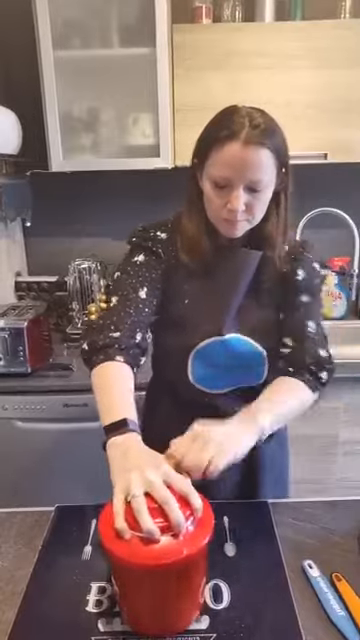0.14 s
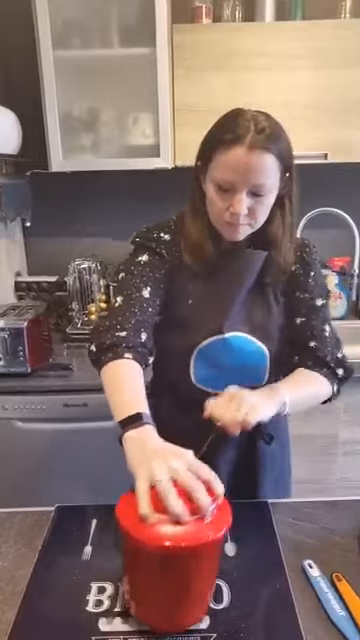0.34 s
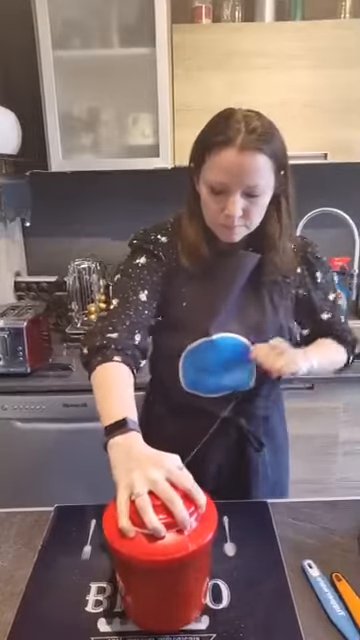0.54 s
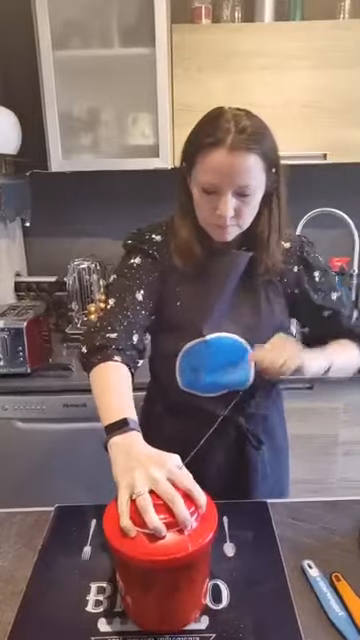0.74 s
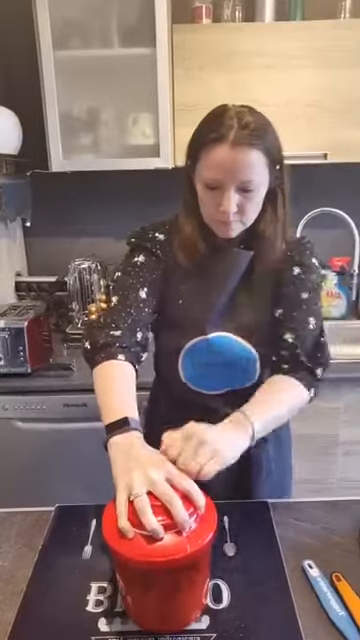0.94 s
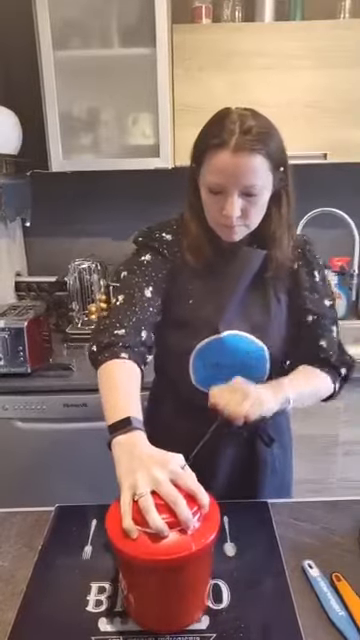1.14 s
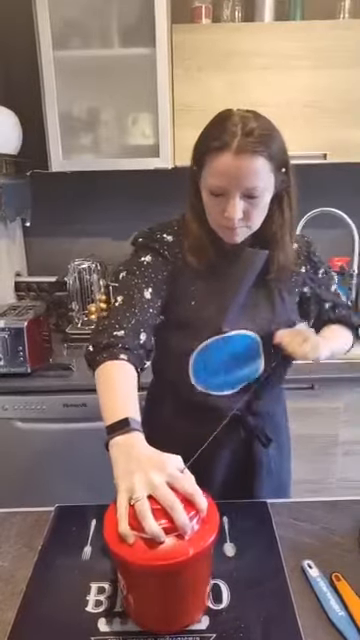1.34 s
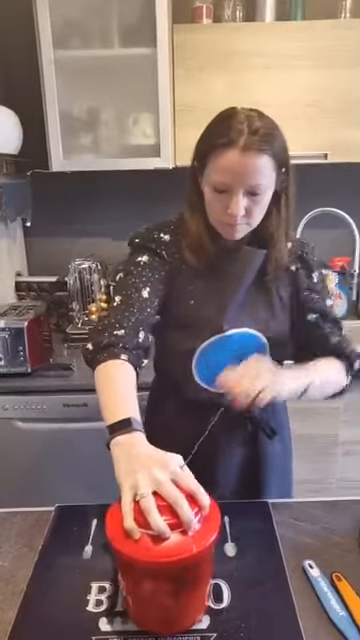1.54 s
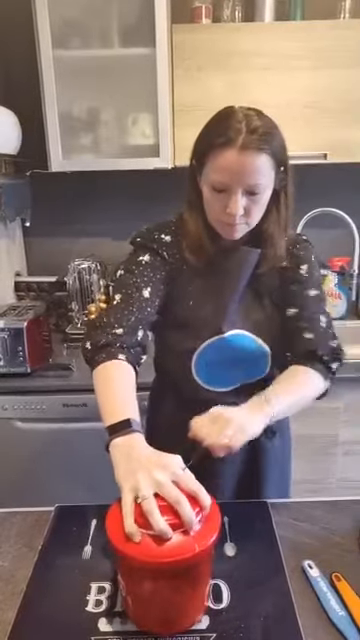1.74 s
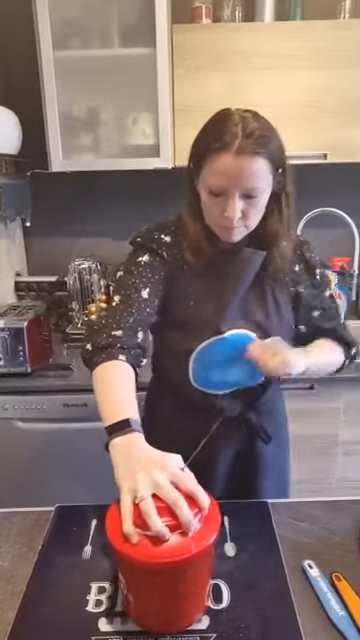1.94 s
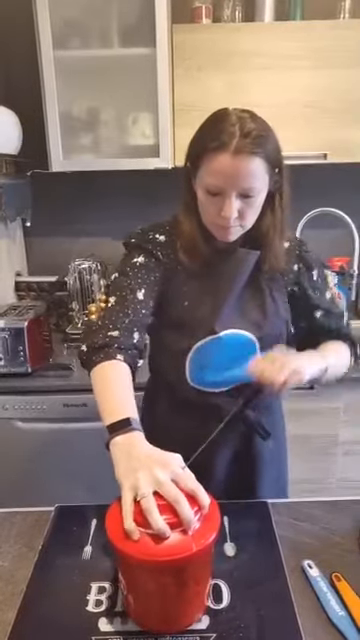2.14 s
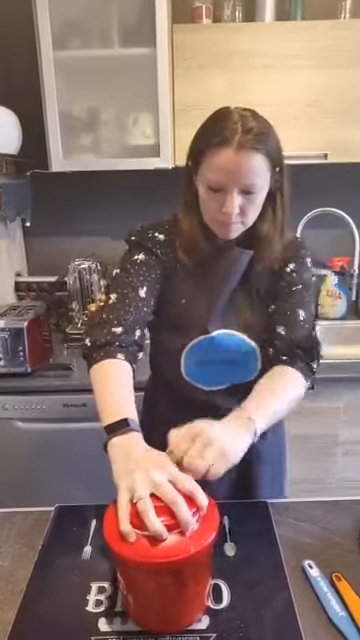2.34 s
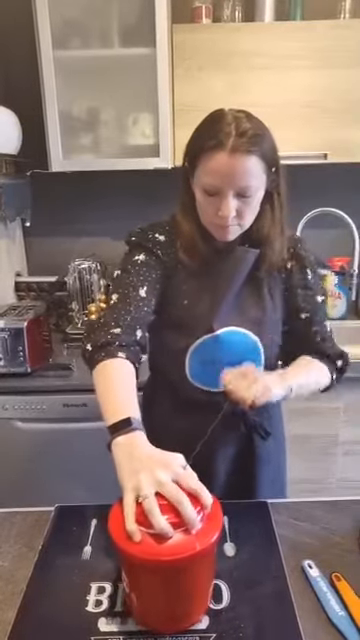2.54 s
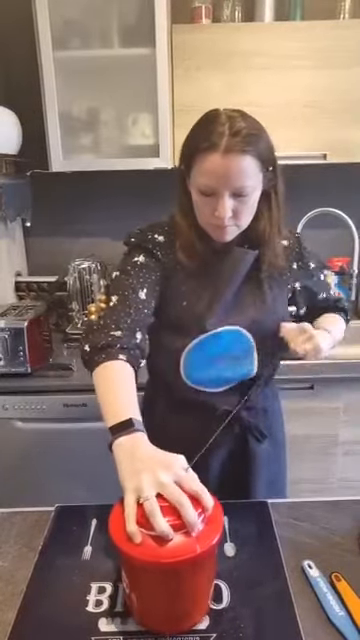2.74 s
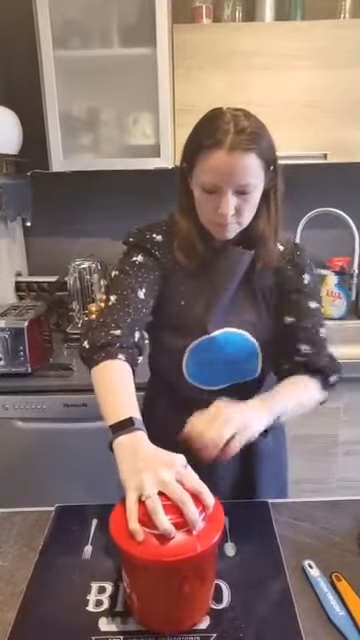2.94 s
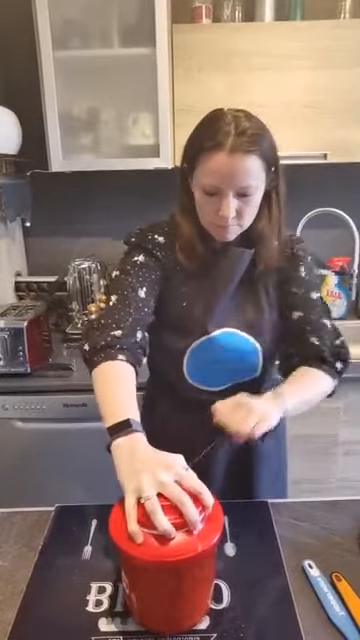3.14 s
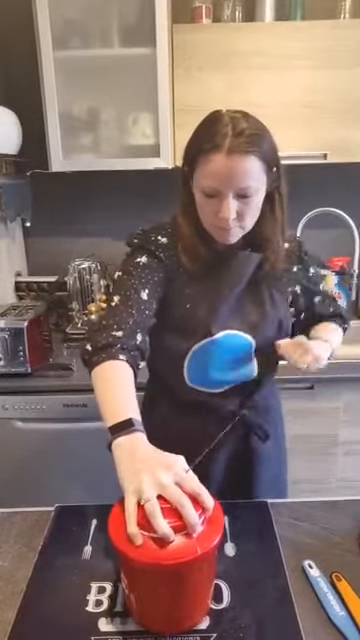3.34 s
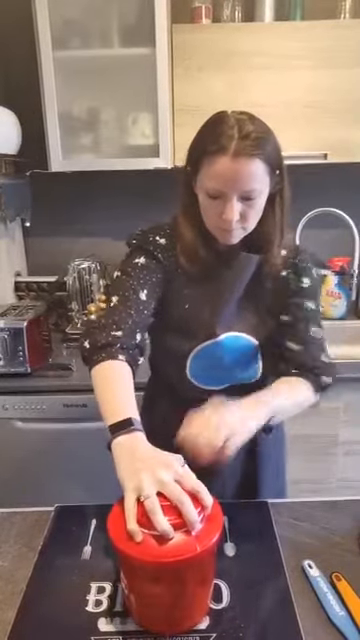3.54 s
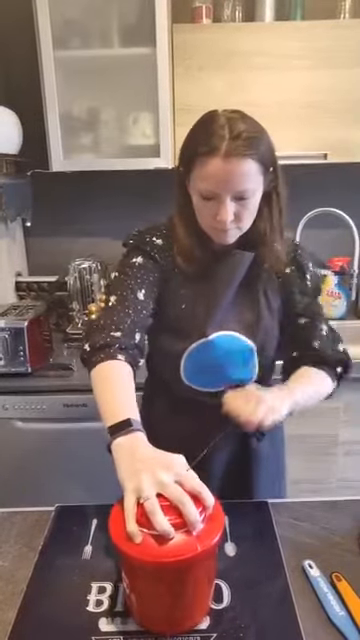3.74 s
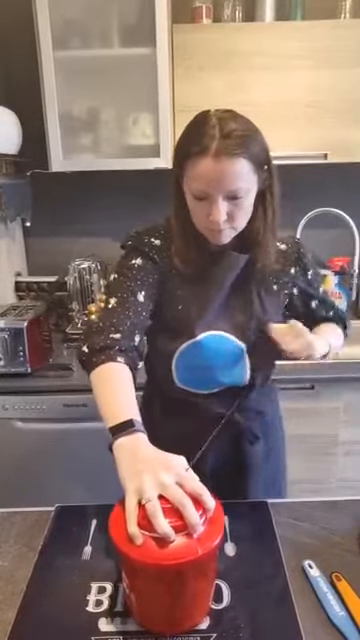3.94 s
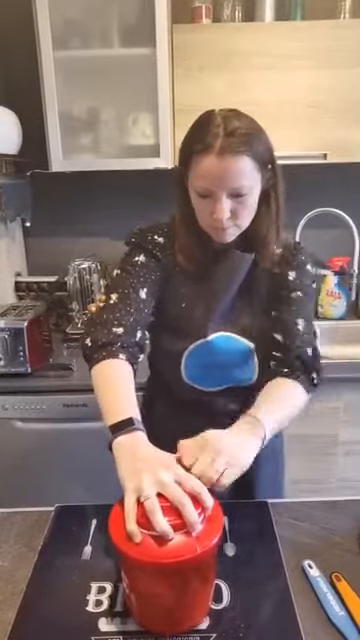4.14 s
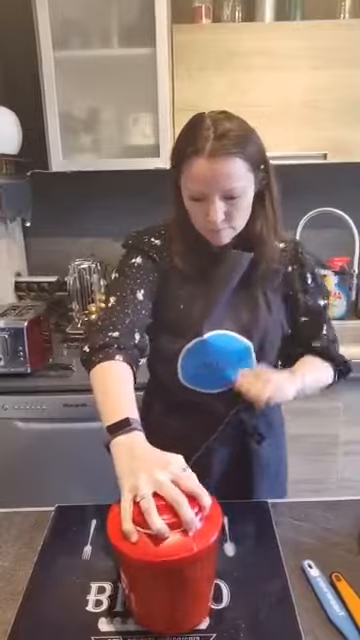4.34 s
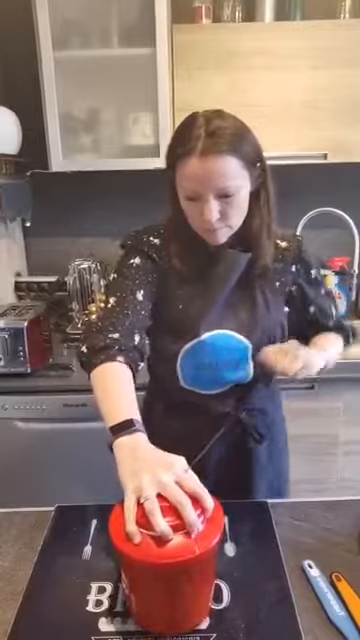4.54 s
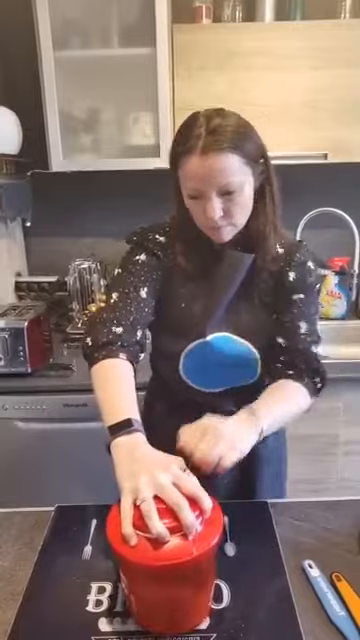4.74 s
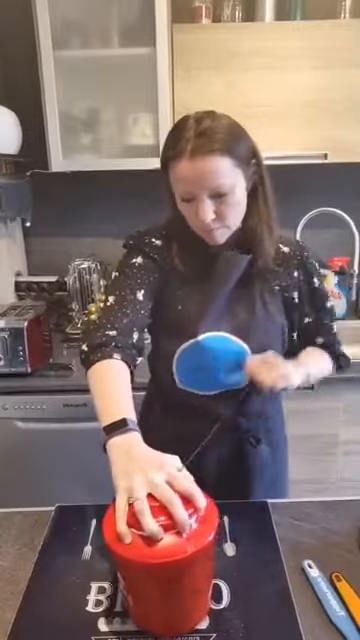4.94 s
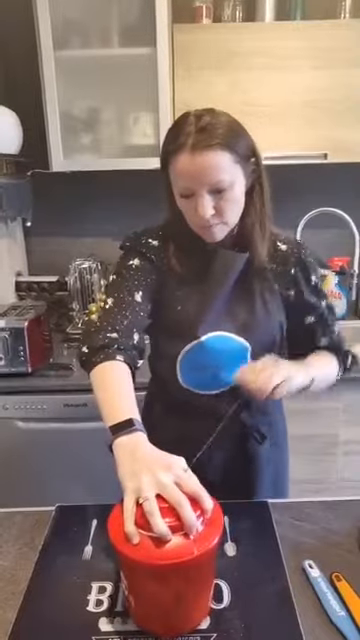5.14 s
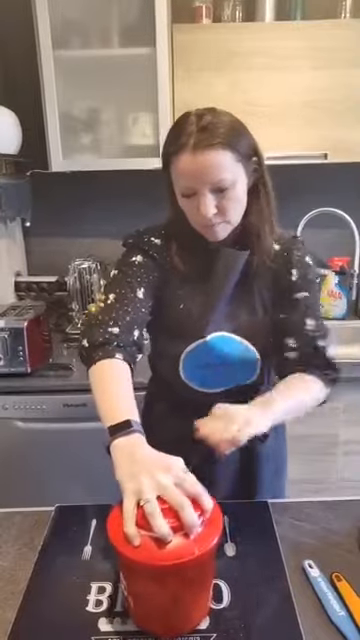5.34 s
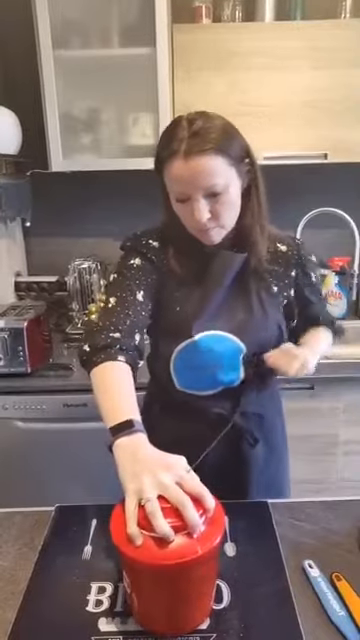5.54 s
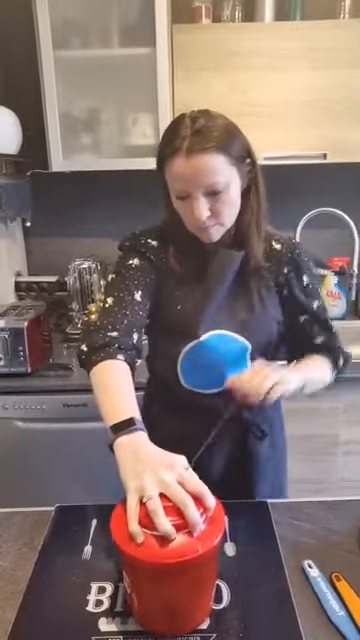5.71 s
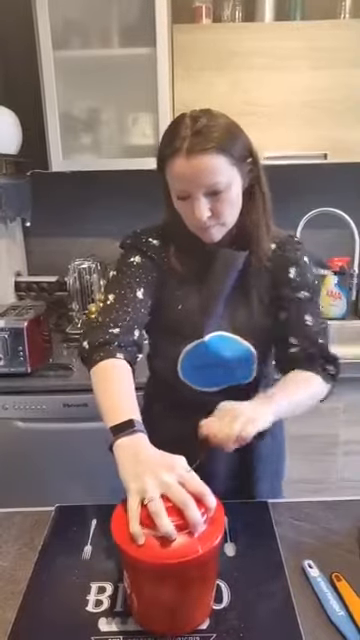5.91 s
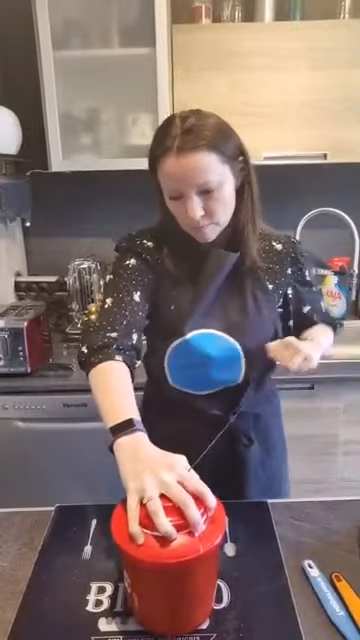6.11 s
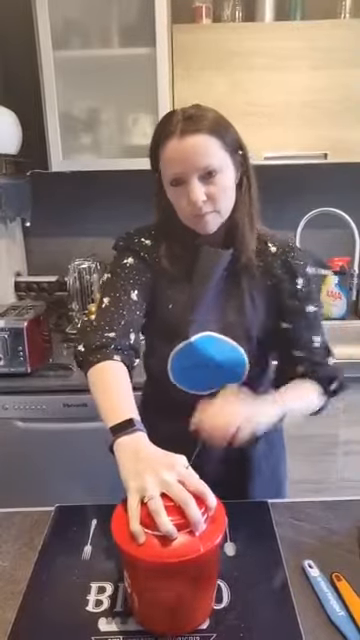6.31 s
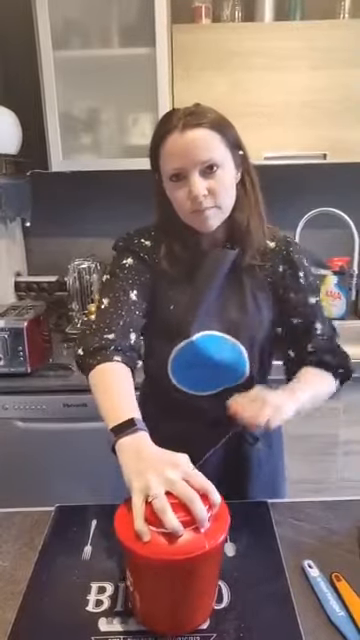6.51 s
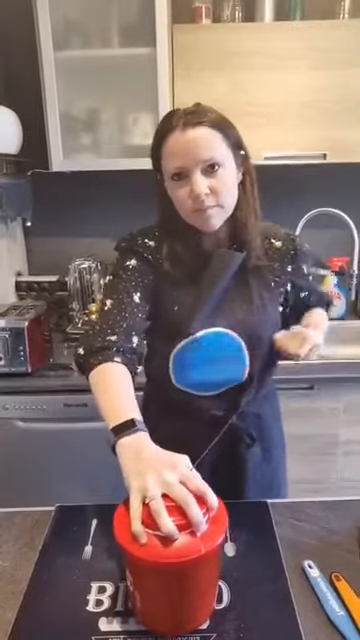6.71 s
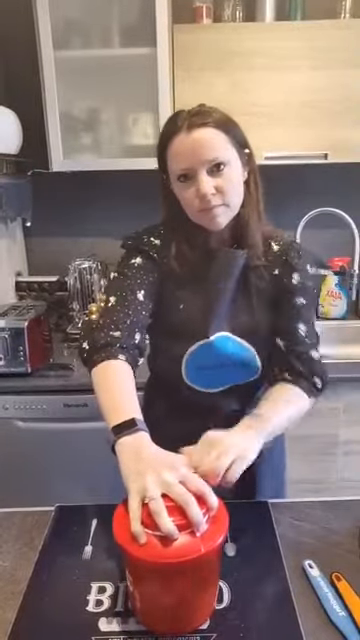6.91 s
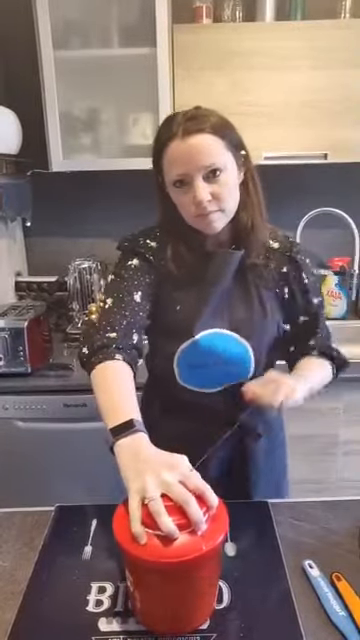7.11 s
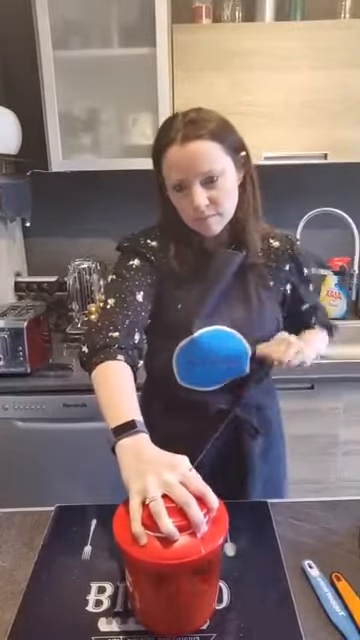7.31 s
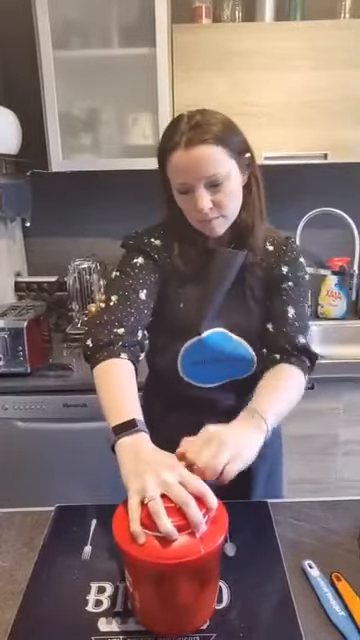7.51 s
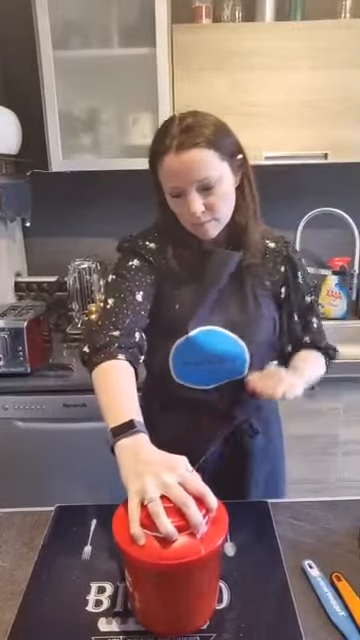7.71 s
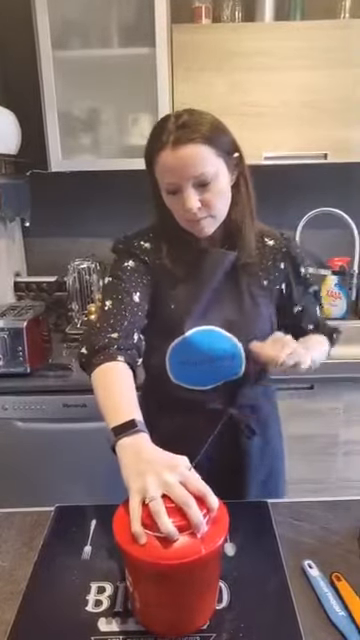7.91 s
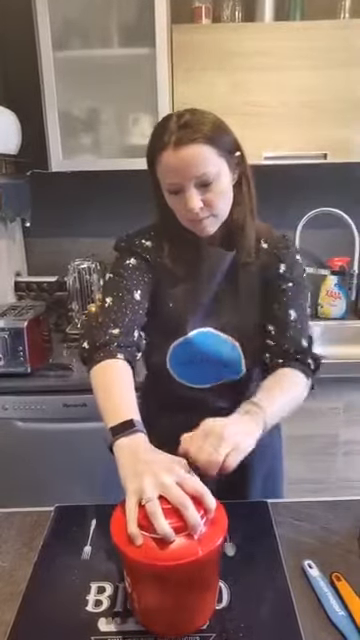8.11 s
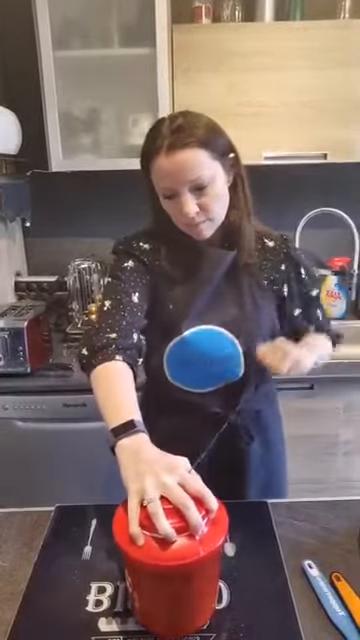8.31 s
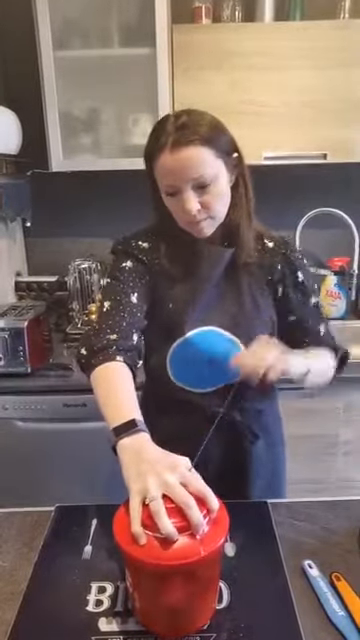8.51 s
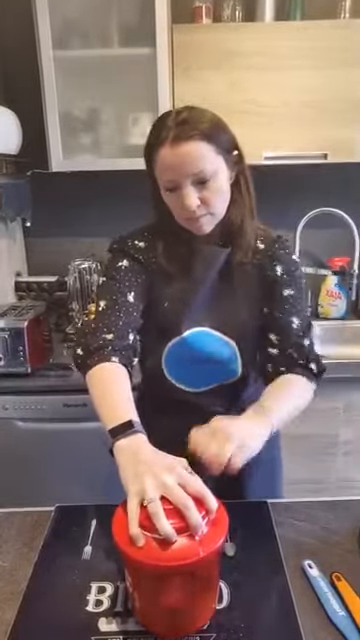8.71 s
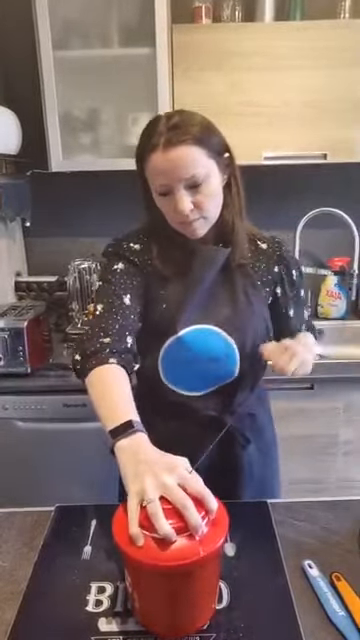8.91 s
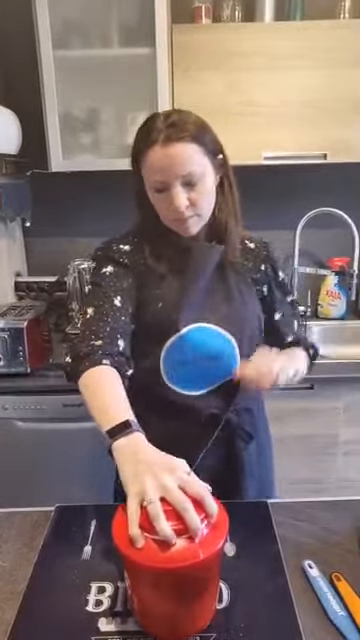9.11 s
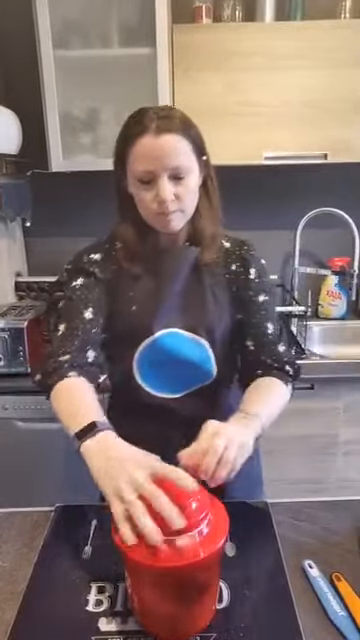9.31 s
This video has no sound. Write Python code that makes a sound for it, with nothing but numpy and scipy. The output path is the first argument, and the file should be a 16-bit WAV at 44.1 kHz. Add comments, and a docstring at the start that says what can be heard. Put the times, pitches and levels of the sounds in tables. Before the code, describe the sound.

A pull-cord kitchen chopper is yanked over and over, grinding biscuits in a plastic bowl and chattering as the cord rewinds.

```python
"""A pull-cord chopper on a counter in a small, hard kitchen. It opens on the cord rewinding.
Then, fifteen times: the clutch snaps in, the tug rocks the bowl on the counter, gears growl and blades
throw biscuit crumbs round the plastic bowl; the arm eases, the pawl catches and chatters in the lid
while the spring rewinds the cord. Here and there the cord snaps taut, the ratchet clicks or a chunk hits
the wall. The last rewind dies away into settling crumbs and a faint room hush."""
import sys
import numpy as np
from scipy import signal
from scipy.fft import rfft, irfft, next_fast_len
from scipy.io import wavfile
from scipy.ndimage import uniform_filter1d, map_coordinates

SR = 44100
rng = np.random.default_rng(int(sys.argv[2]) if len(sys.argv) > 2 else 0)


def log_audio(samples):
    """Write samples as a 16-bit WAV file to the path given in sys.argv[1]."""
    # one column per channel
    frames = np.atleast_2d(samples).T
    # limit to full scale, then quantise
    limited = np.clip(frames, -1, 1)
    pcm = np.round(limited * 32767).astype(np.int16)
    wavfile.write(sys.argv[1], SR, pcm)


N = 417186


def amp(db):
    """Decibels to gain."""
    return 10 ** (np.asarray(db) / 20)


def unit(x):
    """Scale to rms 1."""
    return x / np.sqrt(np.mean(x ** 2) + 1e-20)


def add(track, time_s, sound):
    """Mix a sound in at time_s."""
    track[round(time_s * SR):][:len(sound)] += sound


def log_interp(points, hz):
    """Interpolate (frequency [Hz], value) points on a log axis."""
    knots_hz, values = np.transpose(points)
    return np.interp(np.log(hz + 1), np.log(knots_hz + 1), values)


def wobble(rate_hz):
    """Smooth random curve through rate_hz knots a second."""
    knots = rng.standard_normal(int(N * rate_hz / SR) + 4)
    return map_coordinates(knots, [np.arange(N) * rate_hz / SR])


def coloured(x, spectrum, modes=()):
    """Minimum-phase filter: broad spectrum plus resonance humps; output rms 1."""
    size = 8192
    hz = np.fft.rfftfreq(size, 1 / SR)
    humps_db = sum(db / (1 + (2 * (hz - centre) / width) ** 2) for centre, width, db in modes)
    gain_db = np.maximum(log_interp(spectrum, hz) + humps_db, -100)
    cepstrum = irfft(np.log(amp(gain_db)))
    cepstrum[1:size // 2] *= 2
    cepstrum[size // 2 + 1:] = 0
    impulse = irfft(np.exp(rfft(cepstrum)))
    return unit(signal.fftconvolve(x, impulse)[:N])


def grains(rate_hz, spread_db, decay_s, scrape):
    """Random impacts: tiny noise bursts of uneven size over a bed of scraping."""
    sizes = amp(spread_db * np.clip(rng.standard_normal(N), -2, 2))
    hits = (rng.random(N) < rate_hz / SR) * sizes
    bursts = signal.lfilter([1], [1, -np.exp(-1 / (decay_s * SR))], hits)
    return (unit(bursts) + scrape) * rng.standard_normal(N)


def patchy(x, depth_db):
    """Each impact lands somewhere else, so resonances come and go."""
    bins = signal.stft(x, nperseg=512)[2]
    field = uniform_filter1d(rng.standard_normal(bins.shape), size=5, axis=0)
    field = uniform_filter1d(field, size=8, axis=1)
    return unit(signal.istft(bins * amp(depth_db * unit(field)), nperseg=512)[1][:N])


def room_hush():
    """Faint, steady, dull noise."""
    return amp(-56) * coloured(rng.standard_normal(N), [(30, -6), (150, 3), (2000, -1), (16000, -29)])


# (frequency [Hz], t60 [s])
KITCHEN_DECAY = [(150, 0.38), (2000, 0.34), (12000, 0.16)]

def kitchen_reverb(x):
    """Diffuse room tail; treble dies first."""
    hz, t, bins = signal.stft(rng.standard_normal(SR // 2), SR, nperseg=256)
    decay = amp(-60 * t / log_interp(KITCHEN_DECAY, hz)[:, None])
    tail = signal.istft(bins * decay, SR, nperseg=256)[1]
    return signal.fftconvolve(np.pad(x, (200, 0)), tail / np.linalg.norm(tail))[:N]


# (frequency [Hz], level [dB])
RUMBLE_SPECTRUM = [(12, -45), (20, -16), (101, -8.5), (135, -3), (167, -4.5), (210, 0.5), (280, -2),
                   (360, -27), (620, -120)]

def counter_rumble(level_db):
    """The spinning load shakes the counter top."""
    gain = amp(level_db - 1.5 + 1.7 * wobble(12))
    return gain * coloured(rng.standard_normal(N), RUMBLE_SPECTRUM, [(145.6, 14, 5.7)])


# (frequency [Hz], level [dB], t60 [s])
COUNTER_MODES = [(35, -16, .07), (70.6, -6, 0.1), (137.6, -1.5, 0.15), (205, 0, 0.085)]
# rocking between tugs: (time [s], level [dB])
BOWL_ROCKS = [(0.568, -22.5), (1.547, -35), (1.922, -24), (2.816, -27.5), (5.535, -28), (6.753, -30),
              (7.897, -30)]

def counter_thumps(tug_lag_s=0.048):
    """The bowl rocks, at each tug and between some, and rings the counter top."""
    out, t = np.zeros(N + SR), np.arange(SR // 4) / SR
    attack = 1 - np.exp(-t / 0.0098)
    tugs = [(pull[0] + tug_lag_s, pull[7]) for pull in CORD_PULLS]
    for time_s, db in BOWL_ROCKS + tugs:
        ring = sum(amp(mode_db + rng.normal(0, 1.9) - 60 * t / t60_s) * np.sin(2 * np.pi * hz * t)
                   for hz, mode_db, t60_s in COUNTER_MODES)
        add(out, time_s, amp(db - 1) * attack * ring)
    return out[:N]


# hollow bowl, blade whine, spool ring, spring zing: (frequency [Hz], width [Hz])
PART_RESONANCES = [(779.8, 272), (4310, 250), (2110, 330), (8520, 520)]

def part_rings(level_db, pull_share, ring_dbs, sag_per_db=0.01, sag_below_db=-33):
    """Uneven blows ring bowl and blades on the pull, spool and spring on the rewind."""
    out = np.zeros(N)
    pitch_ratio = 1 + sag_per_db * np.clip(level_db - sag_below_db, -15, 0)
    clock = np.cumsum(pitch_ratio)
    shares = [pull_share, pull_share, 1 - pull_share, 1 - pull_share]
    for (hz, width_hz), db, share in zip(PART_RESONANCES, ring_dbs, shares):
        b, a = signal.iirpeak(hz, hz / width_hz, SR)
        blows = grains(140, spread_db=3, decay_s=0.0085, scrape=0.79)
        tone = unit(signal.lfilter(b, a, signal.lfilter(b, a, blows)))
        out += share * amp(db + 1.7 * wobble(16)) * map_coordinates(tone, [clock], mode="mirror")
    swell_db = 0.36 * (level_db + 29)  # rings grow faster with cord speed than the rattle
    return amp(level_db + swell_db) * out


# (frequency [Hz], level [dB])
GEAR_SPECTRUM = [(140, -56), (230, -17.5), (345, 0), (496, -5), (738, -3), (806, -6.5), (1680, -4.5),
                 (1900, -4.5), (2470, -42.5), (4180, -120)]
# (frequency [Hz], width [Hz], boost [dB])
BODY_MODES = [(339, 22, 3.5), (575, 17, 6.5), (730, 31, 2.5), (1290, 99, 2.5)]

def gear_growl(level_db, centre_hz):
    """Uneven gear teeth shake the bowl; its hollow ring moves with cord speed."""
    teeth = coloured(grains(500, spread_db=3.3, decay_s=0.0016, scrape=1), GEAR_SPECTRUM, BODY_MODES)
    hz, t, bins = signal.stft(teeth, SR, nperseg=1024)
    hump_hz = np.interp(t * SR, np.arange(N), centre_hz)
    hump_db = 6 / (1 + ((hz[:, None] - hump_hz) / (0.4 * hump_hz)) ** 2)
    hollow = signal.istft(bins * amp(hump_db), SR, nperseg=1024)[1][:N]
    return amp(level_db - 0.74) * patchy(hollow, depth_db=2.55)


# (time [s], level [dB], pitch [Hz])
BOWL_KNOCKS = [(0.455, -9.5, 1065), (1.841, -27, 750), (2.206, -22, 2130), (2.76, -18.5, 760),
               (3.755, -23.5, 690), (4.323, -27, 362.7), (4.457, -16, 735), (5.453, -22, 735),
               (5.741, -27, 1950), (6.04, -18, 801), (6.545, -26, 1480), (6.6, -17, 900),
               (6.764, -16.5, 358), (7.913, -24, 423)]

def bowl_knocks(t60_cycles=22):
    """The cord goes taut or a chunk hits the light wall: damped pitch, dull crack, no deep bass."""
    out, t = np.zeros(N + SR), np.arange(SR // 8) / SR
    attack = 1 - np.exp(-t / 0.0014)
    for time_s, db, hz in BOWL_KNOCKS:
        crack = 1.7 * amp(-60 * t / 0.11) * uniform_filter1d(rng.standard_normal(len(t)), size=12)
        tone = amp(-60 * t * hz / t60_cycles) * np.sin(2 * np.pi * hz * t)
        add(out, time_s, amp(db - 3.5) * attack * (tone + crack))
    return signal.sosfilt(signal.butter(2, 150, "high", fs=SR, output="sos"), out[:N])


# (frequency [Hz], level [dB], t60 [s])
LID_MODES = [(2007, -1.5, 0.026), (2113, 3, 0.0094), (4490, 1, 0.0047), (5650, -3, 0.011),
             (7210, -1.5, 0.011), (8700, -4, 0.016), (11900, -37, .02), (14070, -14, .02)]
# cord snapping taut, stray ratchet clicks: (time [s], level [dB], body knock [dB])
LID_CLICKS = [(0.1296, -16, -10), (0.1855, -10.5, -28), (0.208, -15, -22), (0.3252, -15, -16),
              (1.8193, -22, -21), (2.2544, -15, -8), (2.511, -15.5, -10), (2.819, -19, -2),
              (2.9307, -22, -11), (3.6207, -20, -16), (3.6458, -12, -8), (3.7618, -19, -18),
              (4.205, -17, -10), (4.9043, -13, -11), (5.1934, -28, 4), (5.8082, -21, -7),
              (6.0026, -18, -10), (6.3096, -26, -3), (6.965, -22, -10), (7.174, -19, -16),
              (7.4762, -13, -15), (8.5649, -21, 3.5), (8.5867, -20, -7), (8.62, -11, -14),
              (9.3646, -15, -26)]

def lid_clicks(snap_knock_db=-10, catch_knock_db=-4.5):
    """Clutch, taut cord and pawl: double contacts crack and ring the lid; knock sets its low modes."""
    out, t = np.zeros(N + SR), np.arange(SR // 20) / SR
    attack = 1 - np.exp(-t / 0.0002)
    snaps = [(pull[0], pull[6], snap_knock_db) for pull in CORD_PULLS]
    catches = [(rewind[0], rewind[6], catch_knock_db) for rewind in CORD_REWINDS if rewind[0] > 0]
    for time_s, db, knock_db in snaps + catches + LID_CLICKS:
        ring = np.zeros(len(t))
        for hz, mode_db, t60_s in LID_MODES:
            struck_db = mode_db + rng.normal(0, 4.06) + (knock_db + 6.5) * (hz < 3000)
            ring += amp(struck_db - 60 * t / t60_s) * np.sin(2 * np.pi * hz * t + rng.uniform(0, 6.1))
        crack = 0.63 * amp(-60 * t / 0.022) * np.diff(rng.standard_normal(len(t) + 1))
        click = amp(db - 15.5) * attack * (ring + crack)
        add(out, time_s, click)
        add(out, time_s + rng.uniform(0.002, 0.006), 0.92 * click)
    return out[:N]


def movement_power(moves, start_db, engage_s):
    """Rattle power: each cord movement speeds up, holds, then fades."""
    t, power = np.arange(N) / SR, np.zeros(N)
    for start_s, rise_s, hold_s, full_db, eased_db, fade_db_per_s, *_ in moves:
        knots_s = [0, rise_s, rise_s + hold_s, rise_s + hold_s + 1]
        db = np.interp(t - start_s, knots_s, [start_db, full_db, eased_db, eased_db - fade_db_per_s])
        power += np.clip((t - start_s) / engage_s, 0, 1) * amp(2 * db)
    return power


def held_columns(moves, count):
    """Last count columns of the latest movement, per sample."""
    moves = np.array(moves)
    latest = np.searchsorted(moves[:, 0], np.arange(N) / SR, side="right") - 1
    return moves[np.maximum(latest, 0), -count:].T


# (start [s], rise [s], hold [s], full [dB], eased [dB], fade [dB/s], clutch snap [dB], tug [dB],
#  then re rattle: growl [dB], growl sag [dB], rumble [dB], fizz [dB], bowl [dB], whine [dB])
CORD_PULLS = [(0.2853, 0.17, 0.2, -27.5, -27, 140, -19, -32, 0, 2.5, -13.5, -8.5, -20, -15.5),
              (1.065, 0.12, 0.22, -27.5, -26.5, 165, -22, -25.5, -4, -0.5, -16, -8.5, -16, -12.5),
              (1.7754, 0.08, 0.22, -28, -28.5, 149, -17.5, -40, -3, -0.5, -14, -6.5, -7, -18),
              (2.4514, 0.12, 0.2, -27.5, -30.5, 148.7, -14, -29, -1.5, -1.5, -14.5, -7, -16, -12.5),
              (3.1398, 0.1, 0.13, -27, -27.5, 150.3, -9, -33, -2, 3.5, -14.5, -8, -24, -10.5),
              (3.718, 0.093, 0.12, -27, -26.5, 149, -17, -38, -0.5, 5, -15, -6.5, -16, -17),
              (4.2672, 0.11, 0.14, -25.5, -28.5, 164.2, -15, -34, -0.5, 4.5, -15.5, -5.5, -4.5, -15),
              (4.8384, 0.13, 0.12, -26.5, -31.5, 165, -16.5, -35, 0.5, 3, -10.5, -5.5, -5, -17),
              (5.4006, 0.1, 0.13, -29, -30.5, 164.8, -17, -40, -1, 2, -12, -5, -11, -13),
              (5.9653, 0.087, 0.14, -28, -31.5, 165, -12.5, -36, 0.5, 7, -10.5, -5.5, -9, -13),
              (6.5073, 0.1, 0.13, -29.5, -31, 165, -20.5, -36, -0.5, 3, -10, -4.5, -15, -12),
              (7.0689, 0.084, 0.13, -30, -30.5, 150.3, -14, -23.5, 2, 8, -13, -5, -8.5, -7),
              (7.6381, 0.093, .142, -29.5, -31, 164, -16, -28, 0.5, 3, -10.5, -7.5, -12, -11.5),
              (8.2101, 0.098, 0.12, -30.5, -31, 165, -21, -45, -2, 0, -12.5, -5.5, -11, -12),
              (8.8022, 0.11, 0.11, -29.5, -33, 164.6, -19, -50, 0, 3, -15, -6, -15, -16)]
# (start [s], rise [s], hold [s], full [dB], cord home [dB], fade [dB/s], pawl catch [dB],
#  then re rattle: growl [dB], rumble [dB], fizz [dB], spool [dB], zing [dB])
CORD_REWINDS = [(-.12, 0.17, 0.12, -33.5, -36, 135, -40, -4, -19, -10.5, -16, -28),
                (.7751, .09, 0.054, -35, -37.5, 130, -20, -8, -19, -8, -14.5, -14),
                (1.5265, 0.056, 0.093, -34, -38.5, 160.2, -19.5, -5.5, -12, -9, -20, -8),
                (2.2124, 0.012, 0.11, -33, -38.5, 160.5, -17.5, -5.5, -18.5, -8, -13, -12),
                (2.89, 0.031, 0.12, -33, -35.5, 160, -29, -6.5, -17, -7, -11, -4),
                (3.482, 0.033, 0.12, -35, -35.5, 159.8, -19, -5.5, -15.5, -6.5, -3, -7),
                (4.0478, .047, 0.091, -34, -33.5, 170, -19.5, -4.5, -13.5, -9, -8, -7.5),
                (4.611, .084, 0.069, -31.5, -36.5, 160, -25, -5.5, -13, -9.5, -8, -22),
                (5.1706, 0.032, 0.11, -36.5, -35, 180, -30, -5, -12, -10, -7, -7),
                (5.7355, .012, 0.11, -36, -33.5, 170.8, -25, -6, -16, -7.5, -4, -5.5),
                (6.27, 0.11, 0.034, -33, -33, 172, -34, -8, -15, -7.5, -7.5, -8),
                (6.836, 0.064, 0.086, -32, -35.5, 169.7, -26, -6, -15.5, -8, -14, -14),
                (7.412, 0.034, 0.092, -36, -34, 161, -25, -8, -16, -6, -4.5, -4.5),
                (8.006, .055, 0.075, -32.5, -39.5, 170.5, -25, -5, -14, -7, -5, -8),
                (8.5505, 0.048, 0.069, -35, -32, 170.3, -35, -7, -17, -8, -6.5, -7),
                (9.1438, 0.028, 0.16, -34, -41, 148, -33, -7.5, -13.5, -10, -16.5, -21)]

def cord_drive(settling_db=-57):
    """Rattle level from pulls, rewinds and settling crumbs, and the pulls' share of it (0-1)."""
    pull = movement_power(CORD_PULLS, start_db=-43.5, engage_s=0.003)
    rewind = movement_power(CORD_REWINDS, start_db=-41, engage_s=0.013)
    power = pull + rewind + amp(2 * settling_db)
    return 10 * np.log10(power), np.clip(uniform_filter1d(pull / power, size=600), 0, 1)


# stages: 0 clutch bites, 1 full speed, 2 arm eases, 3 pawl catches, 4 full rewind, 5 cord home, 6 = 0
# (stage, growl swing [dB], growl centre [Hz], rumble swing [dB], fizz swing [dB])
STROKE_CYCLE = [(0, 2, 830, 1, -9), (.25, -3.5, 860, 1.5, -0.5), (.5, .5, 900, 3, 3.5),
                (.8, 0.5, 950, 2, 2), (1.2, -1, 870, -0.5, 0.5), (2, -0.5, 800, -3.5, -2),
                (2.5, 2.5, 795.3, 1.5, -3.5), (2.95, 6, 800, 5.5, -2), (3.3, 3.5, 855, 2, 2.5),
                (4, 0.5, 890, 1, 0.3), (5.002, -1, 870, -0.5, -1), (6.001, -2, 855, 3, -6.5)]

def stroke_timbre(pull_share):
    """Layer levels re rattle and growl centre, following the stages of each stroke."""
    stages_s = [np.cumsum(move[:3]) for move in sorted(CORD_PULLS + CORD_REWINDS)] + [[N / SR]]
    stages_s = np.maximum.accumulate(np.concatenate(stages_s))
    stage = np.interp(np.arange(N) / SR, stages_s, 3 + np.arange(len(stages_s))) % 6
    knots, *curves = np.transpose(STROKE_CYCLE)
    growl_db, centre_hz, rumble_db, fizz_db = [np.interp(stage, knots, curve) for curve in curves]
    growl_pull, sag, rumble_pull, fizz_pull, bowl, whine = held_columns(CORD_PULLS, 6)
    growl_back, rumble_back, fizz_back, spool, zing = held_columns(CORD_REWINDS, 5)
    growl_pull = growl_pull - sag * np.clip(stage - 1, 0, 1)
    growl_db += pull_share * growl_pull + (1 - pull_share) * growl_back
    rumble_db += pull_share * rumble_pull + (1 - pull_share) * rumble_back
    fizz_db += pull_share * fizz_pull + (1 - pull_share) * fizz_back
    return growl_db, centre_hz, rumble_db, fizz_db, [bowl, whine, spool, zing]


# (frequency [Hz], level [dB])
CRUMB_SPECTRUM = [(820, -23.5), (1400, -5), (1770, -16), (2400, -2), (3010, -6), (3720, -8.5), (4300, -6.5),
                  (5430, -9), (9710, -12), (14300, -11), (16000, -17)]
PAWL_SPECTRUM = [(820, -26), (1400, -12.5), (1630, -34), (2000, -4.5), (2550, -10.5), (5430, -9.5),
                 (6520, -13), (8420, -12), (9130, -14), (14600, -18), (16000, -29)]
# (frequency [Hz], width [Hz], boost [dB])
BOWL_MODES = [(2017, 277, 11.4), (2287, 72, 4), (4200, 73, 3.1), (8570, 290, 4.7), (9680, 320, 7.3)]
SPOOL_MODES = [(1988, 52, 6.8), (2150, 32, 2.6), (2320, 38, 2.2), (5800, 130, 2.7), (7090, 450, 5.4),
               (8370, 160, 3.4)]

def chopper_rattle(level_db, fizz_db, pull_share, fizz_hz=9500):
    """Dense crumbs while the blades are driven, looser pawl chatter while the spring rewinds."""
    impacts = grains(2500, spread_db=2.1, decay_s=0.00055, scrape=1)
    crumbs = coloured(impacts, CRUMB_SPECTRUM, BOWL_MODES)
    chatter = grains(110, spread_db=3.6, decay_s=0.007, scrape=2.07)
    ticks = grains(800, spread_db=1.7, decay_s=0.0002, scrape=0)
    pawl = coloured(chatter + 1.05 * ticks, PAWL_SPECTRUM, SPOOL_MODES)
    rattle = np.sqrt(pull_share) * patchy(crumbs, depth_db=0.66)
    rattle += np.sqrt(1 - pull_share) * patchy(pawl, depth_db=2.16)
    fizz = signal.sosfiltfilt(signal.butter(4, fizz_hz, "high", fs=SR, output="sos"), rattle)
    fizz_gain = amp(fizz_db + 6 + 1.9 * (1 - pull_share))
    return amp(level_db - 0.5) * (rattle - fizz + fizz_gain * fizz)


def scene():
    """Hush, reverb and chopper, alike in both channels."""
    level_db, pull_share = cord_drive()
    growl_db, centre_hz, rumble_db, fizz_db, ring_dbs = stroke_timbre(pull_share)
    blows = lid_clicks() + bowl_knocks() + counter_thumps()
    running = chopper_rattle(level_db, fizz_db, pull_share)
    running += gear_growl(level_db + growl_db, centre_hz)
    running += counter_rumble(level_db + rumble_db)
    running += part_rings(level_db, pull_share, ring_dbs)
    room = room_hush() + amp(-5.5) * kitchen_reverb(blows) + amp(-10.5) * kitchen_reverb(running)
    mono = room + blows + running
    return np.array([mono, mono])


def record(dry, cutoff_hz=15900):
    """Brick-wall low-pass."""
    size = next_fast_len(N + 4096)
    passband = np.fft.rfftfreq(size, 1 / SR) < cutoff_hz
    return irfft(rfft(dry, size) * passband, size)[:, :N]


dry = scene()
out = record(dry)
log_audio(out)
```